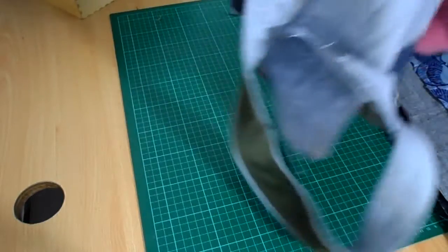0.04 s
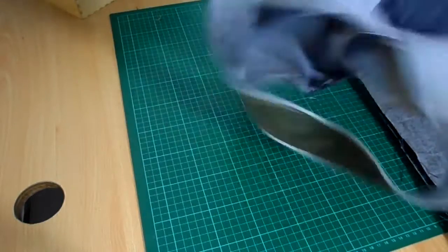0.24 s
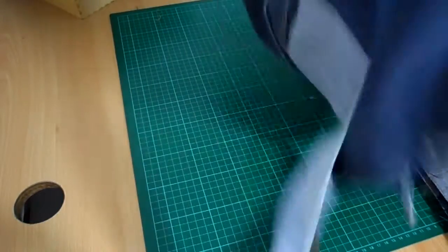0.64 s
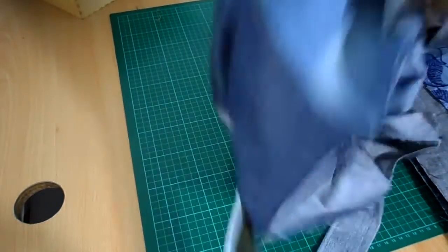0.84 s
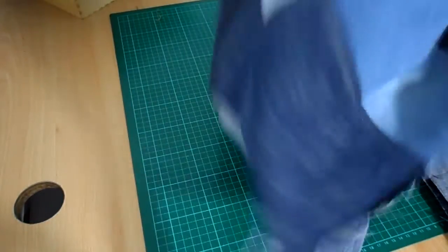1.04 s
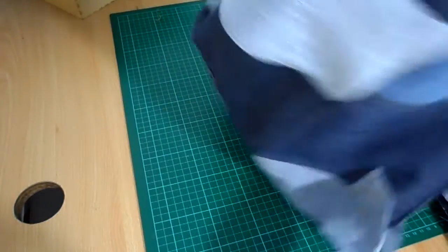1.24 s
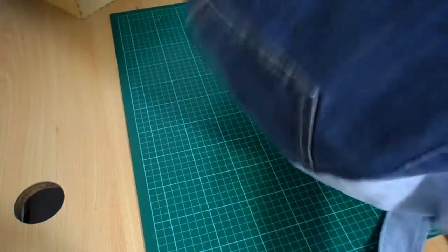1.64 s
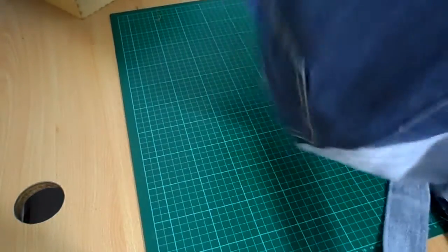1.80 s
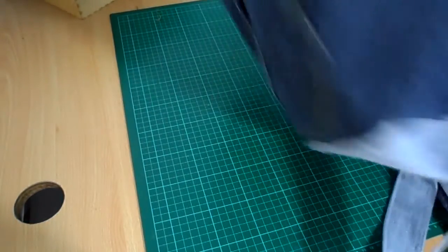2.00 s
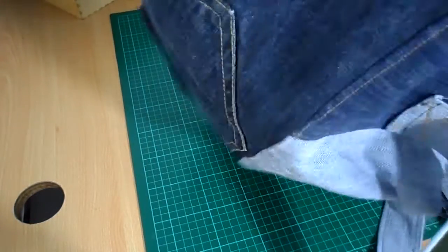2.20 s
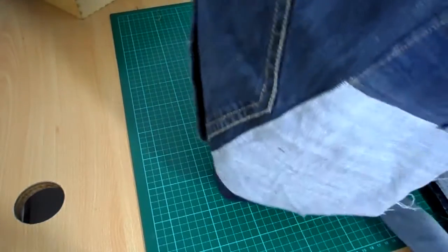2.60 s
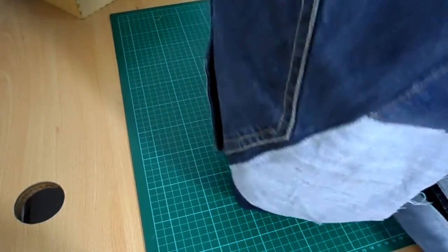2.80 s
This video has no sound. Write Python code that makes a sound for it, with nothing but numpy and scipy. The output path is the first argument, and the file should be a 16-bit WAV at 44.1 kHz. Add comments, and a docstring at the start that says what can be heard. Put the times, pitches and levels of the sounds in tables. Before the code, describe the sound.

Heavy cloth rustles close to the microphone in a quiet room as a denim bag is flipped around. The fabric slides in swelling strokes, with clusters of soft knocks on a wooden table that grow lighter near the end.

```python
"""In a quiet room, on a wooden table close by, a denim bag is turned over.
Stick-slip friction of cloth on cloth hisses in swelling strokes, folds crumple and the heavy panels
billow. Straps, seams and folds bump on the table and excite its modes, each with a short scuff.
A strap snaps taut and twangs, and a fold rubs with a faint note."""
import sys
import numpy as np
from scipy import signal
from scipy.fft import rfft, irfft, next_fast_len
from scipy.io import wavfile
from scipy.ndimage import map_coordinates

SR = 44100
rng = np.random.default_rng(int(sys.argv[2]) if len(sys.argv) > 2 else 0)


def unload_wav(signal):
    """Save mono or channel-first audio to the path in sys.argv[1] as 16-bit WAV at rate SR, clipped to [-1, 1]."""
    wavfile.write(
        sys.argv[1],
        SR,
        np.round(np.clip(np.atleast_2d(signal).T, -1, 1) * 32767).astype(np.int16),
    )


N = 130095


def amp(db):
    """Amplitude ratio of a level in decibels."""
    return 10 ** (np.asarray(db) / 20)


def unit(x):
    """Normalisation to rms 1."""
    return x / np.sqrt(np.mean(x ** 2) + 1e-20)


def along(points, hz):
    """Interpolation of (frequency [Hz], value) points on a logarithmic frequency axis."""
    freqs, values = np.transpose(points)
    return np.interp(np.log(hz + 1), np.log(freqs + 1), values)


def level(rows):
    """Amplitude envelope through (time [s], level [dB]) points."""
    return amp(np.interp(np.arange(N) / SR, *np.transpose(rows)))


def flicker(depth_db, per_s):
    """Random amplitude modulation: a smooth gain through per_s knots a second."""
    knots = rng.standard_normal(int(N * per_s / SR) + 4)
    return amp(depth_db * map_coordinates(knots, [np.arange(N) * per_s / SR]))


def filtered(x, response):
    """Linear filtering: the spectrum of x times a frequency response."""
    n = x.shape[-1]
    padded = next_fast_len(n + SR // 2)
    return irfft(rfft(x, padded) * response(np.fft.rfftfreq(padded, 1 / SR)), padded)[..., :n]


def coloured(x, spectrum):
    """Spectral shaping by (frequency [Hz], relative level [dB]) points, at rms 1."""
    return unit(filtered(x, lambda hz: amp(along(spectrum, hz))))


def add(track, start_s, sound):
    """Superposition of a sound on a track."""
    part = track[round(start_s * SR):][:len(sound)]
    part += sound[:len(part)]


def slips(per_s, spread_db, smooth_db):
    """Stick-slip friction: threads catch and let go as random clicks over smooth noise."""
    clicks = (rng.random(N) < per_s / SR) * rng.choice([-1, 1], N)
    clicks = clicks * amp(spread_db * rng.standard_normal(N))
    return unit(unit(clicks) + amp(smooth_db) * rng.standard_normal(N))


def sliding_weave():
    """Sliding friction of cloth on cloth gives a broadband hiss that swells with each stroke."""
    strokes = [(0.0, -65.5), (0.12, -60.5), (0.17, -64), (0.41, -51.5), (0.52, -58), (0.62, -50.5),
               (0.67, -53.5), (0.79, -55.5), (0.8, -48.5), (0.83, -47), (0.9, -57.5), (0.99, -60),
               (0.99, -56), (1.1, -58.5), (1.12, -53), (1.17, -57), (1.19, -50.5), (1.22, -54),
               (1.26, -49.5), (1.31, -55.5), (1.4, -51), (1.51, -54), (1.55, -59), (1.66, -58.5),
               (1.68, -52.5), (1.7, -49.5), (1.74, -56.5), (1.86, -59.5), (1.92, -47.5), (2.0, -57.5),
               (2.12, -48), (2.15, -52.5), (2.21, -50), (2.28, -57), (2.37, -53), (2.41, -62),
               (2.67, -64.5), (2.69, -54), (2.74, -62.5), (2.89, -61), (2.95, -57)]  # envelope of the sliding (time [s], level [dB])
    spectrum = [(200, -31), (900, 2), (2000, 3.5), (3200, 1), (5000, -1), (7500, -4), (11000, -9),
                (15500, -15.5)]  # friction hiss (frequency [Hz], relative level [dB])
    hiss = coloured(slips(per_s=2500, spread_db=3, smooth_db=3), spectrum)
    return level(strokes) * hiss * flicker(depth_db=0.68, per_s=45)


def crumpling_folds():
    """Crumpling folds emit many small impulses that merge into midrange noise."""
    crumpling = [(0, -56.5), (.18, -57), (.28, -53.5), (.36, -43.5), (.41, -51), (.52, -52), (.64, -45.5),
                 (.77, -46), (.84, -39.5), (.9, -48), (.96, -51.5), (1.0, -46.5), (1.07, -50.5),
                 (1.16, -41), (1.26, -38.5), (1.33, -48.5), (1.41, -44), (1.52, -51.5), (1.58, -64),
                 (1.63, -48), (1.66, -62), (1.8, -45), (1.85, -53.5), (1.93, -44.5), (2.01, -53.5),
                 (2.12, -42.5), (2.17, -55), (2.29, -48.5), (2.36, -43), (2.41, -57), (2.58, -59.5),
                 (2.75, -54), (2.83, -64), (2.95, -50)]  # envelope of the crumpling (time [s], level [dB])
    spectrum = [(120, 10.5), (300, 5.5), (400, 0.5), (550, 6.5), (850, 6.5), (1100, 0), (1400, -0.5),
                (2200, -13.5), (4000, -19), (10000, -39)]  # fold noise (frequency [Hz], relative level [dB])
    rustle = coloured(slips(per_s=450, spread_db=-1, smooth_db=2.5), spectrum)
    return amp(-3) * level(crumpling) * rustle * flicker(depth_db=3.17, per_s=39.72)


def billowing_panels():
    """Heavy panels displace air as they swing and radiate low-frequency noise."""
    swings = [(0, -58), (.18, -59), (.33, -56), (.55, -50), (.85, -55), (.95, -52.5), (1.02, -47.5),
              (1.1, -56), (1.2, -45), (1.3, -60), (1.4, -57), (1.46, -43), (1.58, -53), (1.72, -48.5),
              (1.83, -49), (1.97, -40.5), (2.03, -49.5), (2.1, -44.5), (2.22, -45), (2.3, -48.5),
              (2.47, -52), (2.62, -59.5), (2.74, -55.5), (2.83, -58.5), (2.95, -49.5)]  # envelope of the swinging (time [s], level [dB])
    spectrum = [(12, -10), (32, 7), (60, 3.5), (100, -2), (140, -2.5), (200, -3.5), (300, -1.5), (400, -12),
                (900, -27.5), (3000, -50)]  # displaced air (frequency [Hz], relative level [dB])
    rumble = coloured(slips(per_s=180, spread_db=0.5, smooth_db=-1), spectrum)
    return amp(-2.5) * level(swings) * rumble * flicker(depth_db=0.76, per_s=15)


def push(t, hz, cycles):
    """A cushioned impact: a heavily damped push and rebound, time constant in cycles, peak 1."""
    age = hz * t / cycles
    wave = age ** 2 * np.exp(-age) * np.sin(2 * np.pi * hz * t)
    return wave / np.abs(wave).max()


def table_ring(t):
    """Impulse response of the table top: a sum of damped modes, their gains slightly random."""
    # modes of the wood (frequency [Hz], relative gain at resonance [dB], T60 [s])
    modes = [(140, -2.5, 0.21), (198, -10, 0.34), (228, 1.5, 0.16), (291.5, 10, 0.14), (336, -7, 0.17),
             (415, 4.5, 0.079), (524, 2.5, 0.096), (680, -10, 0.13), (794, 8.5, 0.068), (904, -2, 0.077),
             (1285, 7, 0.058), (1490, 10, .05)]
    gain_db, scatter_db = -4, 1.5
    ring = np.zeros(len(t))
    for hz, db, t60 in modes:
        decay = amp(gain_db + db + scatter_db * rng.normal() - 60 * t / t60)
        unity_at_resonance = 2 * np.log(1000) / (t60 * SR)
        ring += unity_at_resonance * decay * np.cos(2 * np.pi * hz * t)
    return ring


def bumps(contacts):
    """Impact excitation: the bulk thuds and an edge slaps; both ring the table and the room."""
    out, t = np.zeros(N), np.arange(SR // 3) / SR
    slap_return_db = 5  # the surroundings return more of a slap than of a thud
    for start_s, thud_db, thud_hz, slap_db, _ in contacts:
        thud = amp(thud_db) * push(t, thud_hz, cycles=0.22)
        slap = amp(slap_db) * push(t, hz=581, cycles=0.16)
        add(out, start_s, thud + slap)
        add(out, start_s, signal.fftconvolve(thud + slap, table_ring(t)))
        add(out, start_s, signal.fftconvolve(thud + amp(slap_return_db) * slap, reflections()))
    return out


def scuffs(contacts):
    """The cloth skids at each bump; the bursts of friction noise are incoherent and add in power."""
    spectrum = [(150, 8), (500, 7), (900, -4), (1800, 0.5), (3200, -6), (6000, -16), (10000, -48),
                (15500, -57)]  # skidding cloth (frequency [Hz], relative level [dB])
    rise_s, t60_s = 0.00024, 0.085
    power, t = np.zeros(N), np.arange(SR // 3) / SR
    for start_s, *_, db in contacts:
        burst = amp(db - 60 * t / t60_s) * (1 - np.exp(-t / rise_s))
        add(power, start_s, burst ** 2)
    return np.sqrt(power) * coloured(slips(per_s=1000, spread_db=4, smooth_db=-11), spectrum)


def landings():
    """Each contact of the bag with the table combines impact and friction."""
    # contacts (time [s], thud level [dB], thud frequency [Hz], slap level [dB], scuff level [dB])
    contacts = [(.108, -41.5, 198, -38.5, -53), (.119, -46.5, 209, -41.5, -73), (.3, -43.5, 247, -65, -75),
                (0.423, -33, 110, -32.5, -48), (0.4516, -41, 297, -29, -78), (0.4594, -34, 262, -37.5, -64),
                (.4815, -37, 111, -29.5, -61), (.576, -24.5, 205, -22, -40), (.671, -44, 151, -51, -62),
                (.678, -49, 250, -34.5, -47.5), (.721, -40.5, 170, -27.5, -41),
                (0.7238, -45, 203, -39, -53), (0.7299, -41, 70, -41, -54), (.7995, -31.5, 225, -23.5, -36),
                (.813, -33, 77.5, -29, -48), (.82, -31, 150, -24, -36.5), (.827, -34, 196, -46, -54),
                (.837, -35.5, 284, -33, -42), (.8845, -35.5, 270, -28.5, -58), (.89, -51, 250, -34, -62),
                (1.1877, -45, 150, -35, -42.5), (1.19, -27.5, 162, -40, -58), (1.2034, -31, 200, -36, -56),
                (1.355, -46, 110, -55, -65), (1.4755, -39, 208, -30.5, -59), (1.498, -39, 263, -37, -54),
                (1.5075, -33.5, 265, -32, -62), (1.5325, -35.5, 255, -34.5, -54),
                (1.616, -41, 181, -42, -63), (1.678, -27, 225, -33.5, -34.5), (1.695, -25, 161, -32, -41),
                (1.702, -26.5, 326, -29.5, -39), (1.708, -34.5, 43, -36.5, -58),
                (1.756, -38, 260, -45, -62), (1.861, -34, 169, -51, -60), (1.8795, -51, 245, -37, -39.5),
                (1.895, -41, 198, -42, -63), (1.947, -25, 167, -30.5, -43.5),
                (2.113, -41.5, 235, -40.5, -50), (2.2315, -34, 183, -31, -51), (2.32, -38, 293, -42, -50),
                (2.478, -42, 208, -48, -71), (2.6845, -34.5, 225, -35.5, -54)]
    return bumps(contacts) + scuffs(contacts)


def strap():
    """Free vibration under tension: a strap snaps taut and twangs in damped sinusoids."""
    partials = [(0.2119, -39, 401.6, 0.23), (0.2118, -37.5, 478, 0.043), (0.301, -51.5, 431.5, 0.62)]  # strap vibrations (time [s], level [dB], frequency [Hz], T60 [s])
    rise_s = 0.00033
    out, t = np.zeros(N), np.arange(SR // 3) / SR
    for start_s, db, hz, t60 in partials:
        envelope = amp(db - 60 * t / t60) * (1 - np.exp(-t / rise_s))
        add(out, start_s, envelope * np.sin(2 * np.pi * hz * t))
    return out * flicker(depth_db=1, per_s=62.7)


def swishes():
    """One layer slips quickly over another: friction noise under Gaussian envelopes."""
    passes = [(1.001, 0.016, -47.5), (1.815, 0.008, -53), (2.363, 0.033, -54)]  # quick slips (peak time [s], half-width [s], level [dB])
    spectrum = [(300, -22), (900, 9), (1400, 11.5), (2200, 4), (3500, -8), (9000, -29)]  # slipping layers (frequency [Hz], relative level [dB])
    t = np.arange(N) / SR
    envelope = sum(amp(db) * np.exp(-((t - peak_s) / width_s) ** 2) for peak_s, width_s, db in passes)
    return envelope * coloured(slips(per_s=830, spread_db=-1, smooth_db=0), spectrum)


def rubbed_fold():
    """A fold drags: narrow-band friction noise is heard as a faint, rough note."""
    peak_s, half_width_s, centre_hz, half_band_hz = 2.665, 0.031, 570, 60
    band = filtered(rng.standard_normal(N), lambda hz: np.exp(-((hz - centre_hz) / half_band_hz) ** 2))
    envelope = np.exp(-((np.arange(N) / SR - peak_s) / half_width_s) ** 2)
    return amp(-54) * envelope * unit(band)


def reflections():
    """A random room impulse response: early reflections and reverberation decay exponentially."""
    room_t60 = [(100, 0.18), (500, 0.34), (2000, 0.06), (10000, 0.12)]  # reverberation time (frequency [Hz], T60 [s])
    late_db, early_db, early_t60_s, wall_delay_s = -11, -10, 0.11, 0.00297
    hz, t, noise = signal.stft(rng.standard_normal((2, SR // 3)), SR, nperseg=256)
    late = signal.istft(noise[0] * amp(-60 * t / along(room_t60, hz)[:, None]), SR, nperseg=256)[1]
    early = signal.istft(noise[1] * amp(-60 * t / early_t60_s), SR, nperseg=256)[1]
    tail = amp(late_db) * late / np.linalg.norm(late) + amp(early_db) * early / np.linalg.norm(early)
    return np.pad(tail, (round(wall_delay_s * SR), 0))


def room_noise():
    """The noise floor of the room: faint stationary noise, strongest in the bass."""
    spectrum = [(15, -15.5), (40, -1), (90, -10.5), (135, -3.5), (220, -27), (400, -17), (1000, -29),
                (3000, -27), (8000, -33), (15500, -35.5)]  # ambient noise (frequency [Hz], relative level [dB])
    return amp(-56.5) * coloured(rng.standard_normal(N), spectrum)


def scene():
    """The sources superpose; two identical channels place them in the centre."""
    cloth = sliding_weave() + crumpling_folds() + billowing_panels()
    mono = cloth + landings() + strap() + swishes() + rubbed_fold() + room_noise()
    return np.array([mono, mono])


def record(dry):
    """Band limiting by an ideal low-pass filter."""
    cutoff_hz = 15750
    return filtered(dry, lambda hz: hz < cutoff_hz)


dry = scene()
out = record(dry)
unload_wav(out)
```